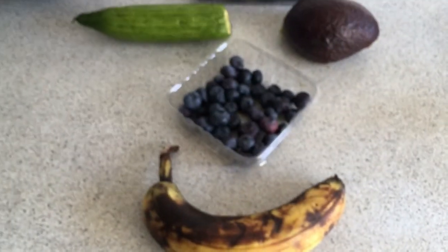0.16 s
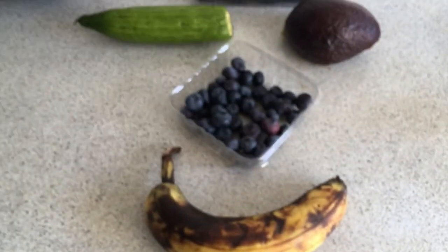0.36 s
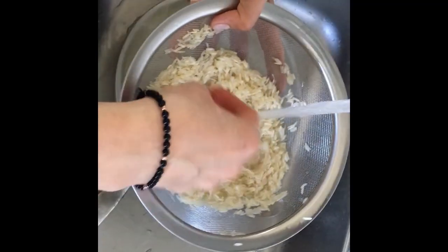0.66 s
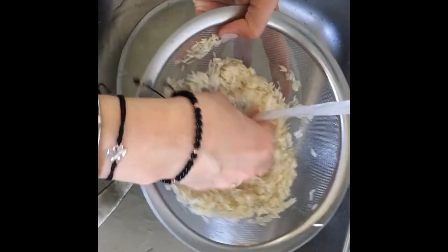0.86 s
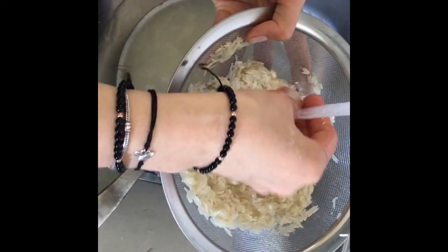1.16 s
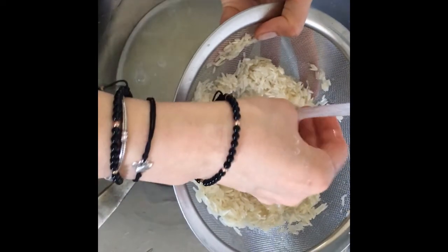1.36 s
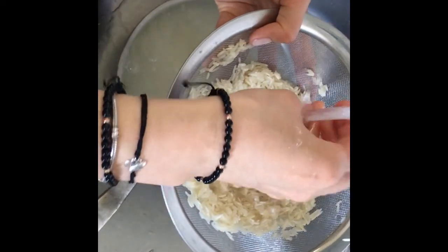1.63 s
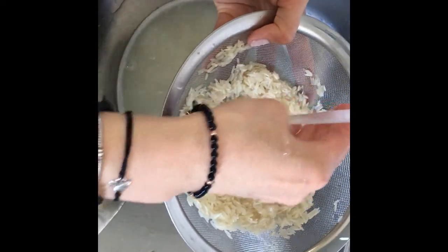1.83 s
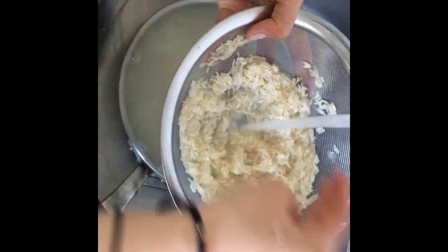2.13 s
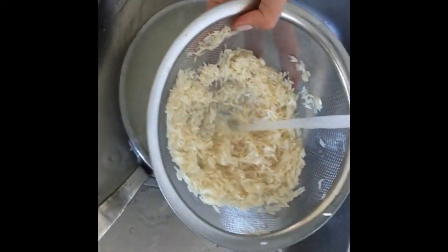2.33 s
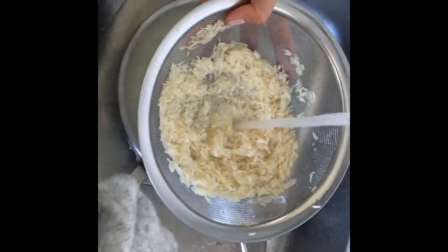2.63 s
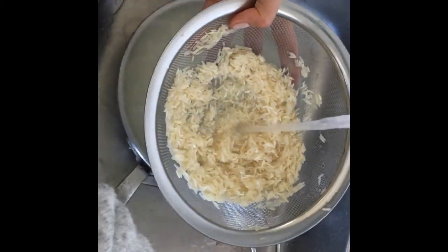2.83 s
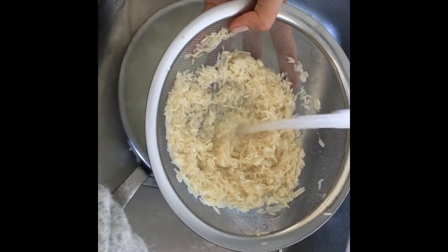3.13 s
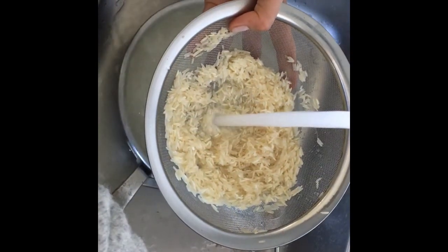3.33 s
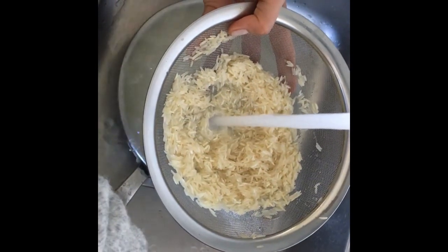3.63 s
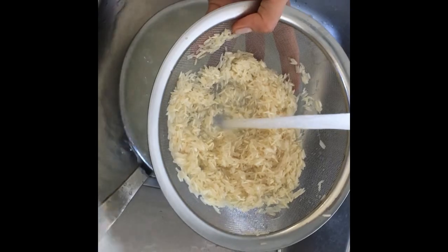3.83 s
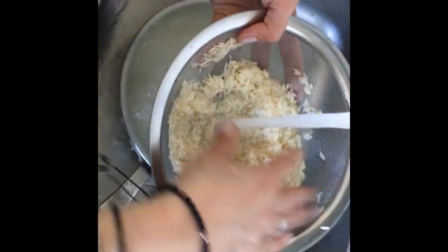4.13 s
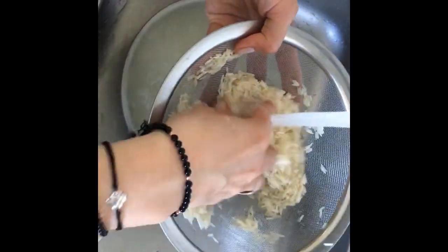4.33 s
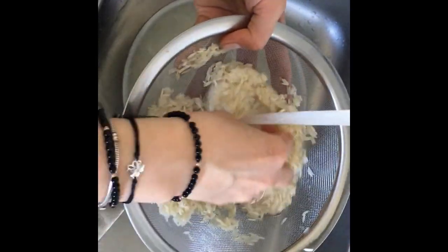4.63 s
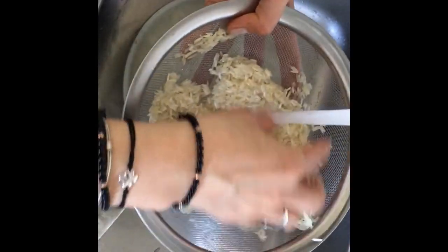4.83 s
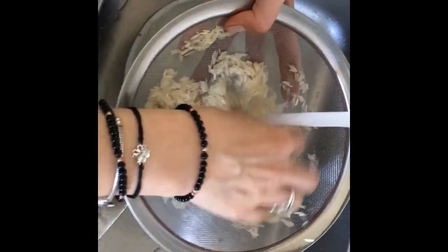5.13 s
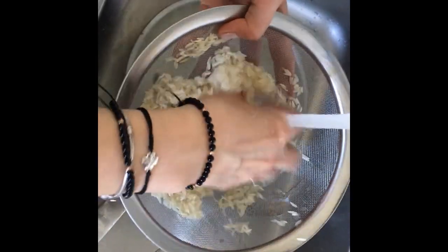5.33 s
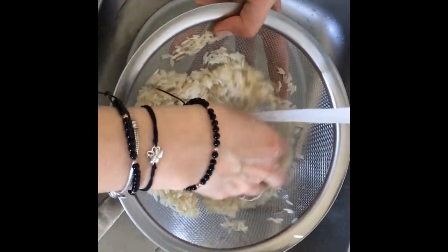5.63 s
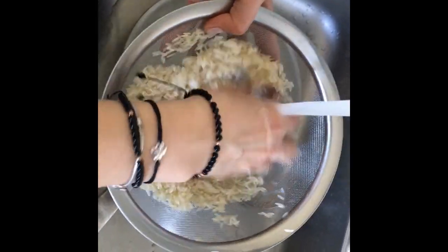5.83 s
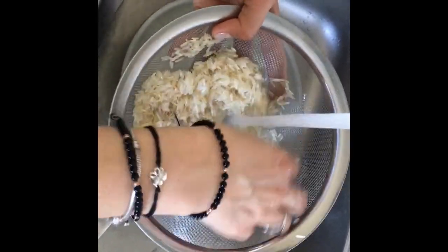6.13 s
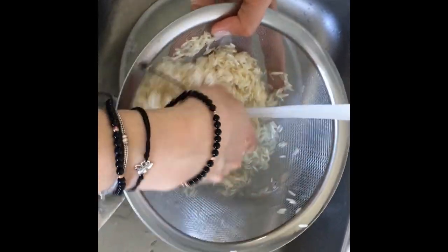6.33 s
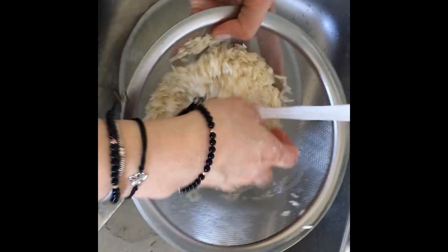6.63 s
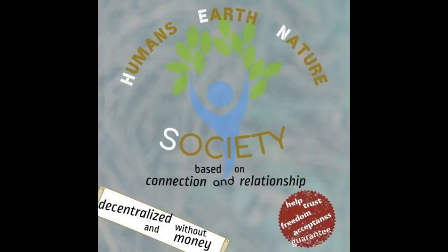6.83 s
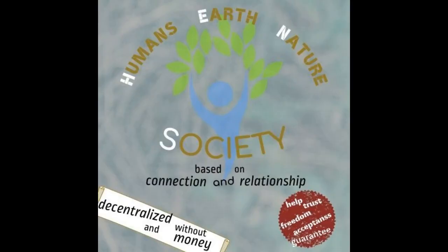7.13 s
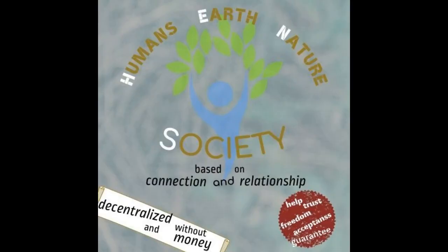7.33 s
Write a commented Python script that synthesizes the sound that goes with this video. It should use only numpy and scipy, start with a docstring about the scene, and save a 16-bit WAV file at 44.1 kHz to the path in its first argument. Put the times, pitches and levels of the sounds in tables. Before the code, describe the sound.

A close, bright stream of water patters over wet rice in a metal sieve, with bubbly glugs below, strengthening midway before cutting to silence.

```python
"""Tap water runs onto rice in a steel sieve while a hand stirs it, close up in a kitchen; mono.
The jet is a patter of echoing clicks in coloured bands; air pockets ring as decaying, gliding sines.
The run-off gurgles as a stream of bubbles, glugs into a bowl and drums on the modes of a steel sink.
A moment of quiet, humming kitchen comes first; the water cuts in and out abruptly, then silence."""
import sys
import numpy as np
from scipy import signal
from scipy.fft import rfft, irfft
from scipy.io import wavfile
from scipy.ndimage import uniform_filter1d

SR = 44100
rng = np.random.default_rng(int(sys.argv[2]) if len(sys.argv) > 2 else 0)


def transcribe(signal):
    """Save signal, clipped to [-1, 1], as a 16-bit WAV file at the path in sys.argv[1]."""
    frames = np.atleast_2d(signal).T
    limited = np.clip(frames, -1, 1)
    pcm = np.round(limited * 32767).astype(np.int16)
    wavfile.write(sys.argv[1], SR, pcm)


N = 329427
T = np.arange(N) / SR  # seconds

# Force of the jet on the rice; the tap opens further just after three seconds.
# Each row: time in seconds, spray level in dB.
JET_FORCE = [(.6, -44), (1.15, -44.5), (1.4, -46), (1.75, -48), (2.1, -46), (2.3, -44), (2.7, -44.5),
             (2.9, -47), (3.13, -51), (3.18, -48), (3.27, -45), (3.38, -39.5), (3.58, -36), (3.95, -40.5),
             (4.36, -36.5), (4.5, -39), (4.66, -36.5), (4.8, -40.5), (4.9, -39), (5.14, -41.5),
             (5.4, -38.5), (5.5, -35), (5.62, -36.5), (5.8, -37), (6.18, -40.5), (6.85, -39.5)]
# The jet bores into the wet rice and sizzles. Each row: time in seconds, level against the spray in dB.
SIZZLE_CURVE = [(3.2, -11.5), (3.45, -2), (3.65, -1.5), (3.85, -3.5), (4.2, -8), (4.5, -12)]
# How finely the jet breaks up. Each row: time in seconds, droplets per second.
JET_BREAKUP = [(.6, 340), (.9, 1140), (1.1, 810), (3.1, 660), (3.5, 1800), (4.4, 1700), (5.3, 4900),
               (6.85, 15000)]
# Spectrum of the spray. Each row: frequency in Hz, relative density in dB per Hz.
SPRAY_SPECTRUM = [(900, -8.5), (2500, -0.5), (4200, 0.5), (6200, 3.5), (8000, -2), (9500, 1.5),
                  (11000, -10), (14000, -18)]
# Spectrum of the high mist, in the same columns: frequency in Hz, relative density in dB per Hz.
MIST_SPECTRUM = [(5000, -30.5), (9000, -14), (11500, 2.5), (13500, 3), (15500, 3), (17000, -26)]
# levels in dB at the usual force: the spray itself, its mist, fizz in the rice, prickle, splashes
USUAL_DB, MIST_DB, FIZZ_DB, PRICKLE_DB, SPATTER_DB = -39, -39, -53, -47.5, -50.5
# dB gained per dB of force
MIST_FOLLOWS, FIZZ_FOLLOWS, SPATTER_FOLLOWS = 1, 1, 0.68
# a burst air pocket leaves a trail of fizz: level against the pop in dB, time to die in s
TRAIL_DB, TRAIL_T60_S = -21, 0.28


def jet():
    """Impact noise: drops spatter on the rice and air between the grains fizzes, all following the force."""
    spray_db = in_time(JET_FORCE)[0] + sweeps()
    force_db = spray_db - USUAL_DB
    drops = patter(*in_time(JET_BREAKUP))

    sizzle_db, = in_time(SIZZLE_CURVE)
    sizzle = rms_one(resonance(impacts(per_s=4000, spread_db=8.5), hz=8500, width_hz=910))
    spray = from_db(spray_db) * (coloured(drops, SPRAY_SPECTRUM) + from_db(sizzle_db) * sizzle)
    mist = from_db(MIST_DB + MIST_FOLLOWS * force_db) * coloured(drops, MIST_SPECTRUM)

    fizz = bubbles(per_s=140, centre_hz=2300, octaves=1.1, cycles=34, spread_db=4.6, rise=.04)
    steady_fizz_gain = from_db(FIZZ_DB + FIZZ_FOLLOWS * force_db)
    trail_gain = from_db(TRAIL_DB) * aftermath(POP_EVENTS, TRAIL_T60_S)
    fizz = np.hypot(steady_fizz_gain, trail_gain) * fizz  # the two powers add
    prickle = bubbles(per_s=170, centre_hz=5800, octaves=1.0, cycles=50, spread_db=4.5, rise=.04)
    prickle = from_db(PRICKLE_DB + force_db) * prickle

    splashes = spatter(per_s=60, low_hz=1450, high_hz=6000, t60=.016, width=.13, spread_db=9.5)
    splashes = from_db(SPATTER_DB + SPATTER_FOLLOWS * force_db) * splashes
    return spray + mist + fizz + prickle + splashes


# The stirring hand sweeps through the jet and the spray swells, or is briefly shielded.
# Each row: time of the height in seconds, length in seconds, gain in dB.
HAND_SWEEPS = [(0.901, 0.2, 9.5), (5.037, 0.16, 3.5), (5.292, 0.27, 5.5), (5.75, 0.13, 2.5),
               (5.909, 0.13, 4.5), (6.014, 0.25, 5), (6.202, 0.05, -2.5), (6.255, 0.046, 6.5),
               (6.471, 0.46, 5), (6.672, 0.097, -5)]


def sweeps():
    """Amplitude modulation: each pass of the hand raises or lowers the spray in one smooth hump, in dB."""
    total_db = 0
    for s, length, db in HAND_SWEEPS:
        total_db = total_db + db * np.cos(np.pi * np.clip((T - s) / length, -.5, .5)) ** 2
    return total_db


def patter(per_s):
    """Clustered shot noise: droplets tick in clumps with a wash of echoes; the finer the jet, the smoother."""
    t = T[:SR // 4]
    clumps = signal.fftconvolve(np.abs(impacts(per_s=75, spread_db=3.0)), dying(t, t60=0.024))[:N]
    ticks = steadied(impacts(per_s, spread_db=4.2), size=9001)
    ticks = ticks * np.sqrt(1 + 1300 / per_s * np.abs(clumps) / clumps.mean())
    # diffuse echoes: noise that follows the decaying power of the ticks
    echo_power = dying(t, t60=0.08) ** 2 + from_db(-10.0) ** 2 * dying(t, t60=0.39) ** 2
    wash_power = signal.fftconvolve(ticks ** 2, echo_power / echo_power.sum())[:N]
    wash = np.sqrt(np.abs(wash_power)) * rng.standard_normal(N)
    return steadied(ticks + from_db(2.0) * wash, size=5001)


def spatter(per_s, low_hz, high_hz, t60, width, spread_db):
    """Band-limited noise bursts: small splashes at random, each around a pitch of its own."""
    out, t = np.zeros(N), T[:SR // 20]
    starts = np.flatnonzero(rng.random(N) < per_s / SR)
    for at, (size, strength, life) in zip(starts, rng.random((len(starts), 3))):
        hz = low_hz * (high_hz / low_hz) ** size
        noise = rng.standard_normal(len(t)) * dying(t, t60 * (.5 + life))
        burst = resonance(noise, hz, width * hz)
        burst = rms_one(resonance(burst, hz, 2 * width * hz))
        add(out, at / SR, from_db(spread_db * strength) * burst)
    return rms_one(in_basin(out, near_db=3.0, room_db=-3.0)[:N])


# Sharp splats of drops. Each row: start in seconds, level of the loudest 5 ms in dB,
# centre of the band in Hz, strength of crack and echoes against the first click in dB (offset below).
SPLAT_EVENTS = [(0.675, -28.5, 12500, 7), (0.772, -32, 6100, 12), (0.83, -35.5, 6000, 13),
                (.947, -35, 6370, 2.5), (1.034, -30.5, 5960, 6.5), (1.1281, -24.5, 13100, 9),
                (1.157, -31, 8440, -0.5), (1.219, -34.5, 8800, 17), (1.3898, -31, 4300, 11.5),
                (1.459, -35.5, 8000, 10.5), (1.586, -32, 14500, 2), (1.6464, -28.5, 6300, -1),
                (1.845, -24.5, 11100, 6), (2.0208, -27.5, 13900, 6), (2.1244, -19, 6200, 4.5),
                (2.207, -35, 13000, 9), (2.269, -29, 13000, 9), (2.295, -34, 7560, 3),
                (2.3626, -33, 11000, 0), (2.461, -37, 7000, 8), (2.529, -34, 12500, 6),
                (2.557, -42, 5500, 6), (2.618, -41, 13000, 9), (2.6768, -28.5, 5350, 2),
                (2.749, -41, 12000, 14), (2.7824, -35.5, 13800, 5.5), (3.023, -34.5, 13900, 1),
                (3.159, -31, 13300, 8), (3.23, -30, 13600, 10), (3.381, -31, 11900, 6.5),
                (3.4835, -22, 12500, 4.5), (3.614, -26, 8400, 3), (3.816, -23, 13000, 6.5),
                (3.983, -23.5, 11900, -3.5), (4.2644, -28.5, 8300, -14), (4.4457, -24.5, 14000, 4.5),
                (5.029, -15.5, 16600, 9), (5.7638, -24.5, 12000, 8), (6.148, -29.5, 6540, 1)]
# relative width of a splat's band at full scale; softer splats are narrower
SPLAT_WIDTH = 1.75
# share of a splat that spreads over the whole treble in dB, and where that starts in Hz
SPLAT_BROAD_DB, SPLAT_BROAD_HZ = -11.5, 1200


def splats():
    """Transient impact: a large drop slaps down with a click and crack in a broad band, then a wash of echoes."""
    out, t = np.zeros(N), T[:SR // 30]
    for s, db, hz, wash_db in SPLAT_EVENTS:
        click = t == 0
        crack = rng.standard_normal(len(t)) * dying(t, t60=0.008) * from_db(wash_db - 14) + click
        crack = in_basin(crack, near_db=wash_db - 4, near_t60=0.04, room_db=wash_db - 14, room_t60=.25)
        span = 1 + SPLAT_WIDTH * from_db(db / 2)
        edges = np.clip([hz / span, hz * span], 100, SR / 2 - 2000)
        band = signal.sosfilt(signal.butter(2, edges, "band", fs=SR, output="sos"), crack)
        broad = signal.sosfilt(signal.butter(1, SPLAT_BROAD_HZ, "high", fs=SR, output="sos"), crack)
        add(out, s, at_peak(band + from_db(SPLAT_BROAD_DB) * broad, db))
    return out


# Small air pockets bursting. Each row: start in seconds, level of the loudest 5 ms in dB, pitch in Hz.
POP_EVENTS = [(0.599, -40, 1810), (.626, -41, 1430), (0.675, -36.5, 2200), (0.711, -33.5, 2890),
              (0.733, -43, 1770), (0.7645, -29, 2840), (0.771, -34.5, 1520), (0.8148, -29.5, 2250),
              (0.9883, -41.5, 1200), (1.194, -43, 1670), (1.258, -35, 2280), (1.2962, -26, 2160),
              (1.396, -38, 1980), (1.4198, -39, 2090), (1.464, -39.5, 1610), (1.5992, -34.5, 4200),
              (1.62, -35.5, 3250), (1.644, -36.5, 1930), (1.7297, -43.5, 2210), (1.823, -29, 2026),
              (1.846, -27, 1830), (2.0826, -43, 1400), (2.1258, -36.5, 1820), (2.1765, -42, 2590),
              (2.2427, -36, 2130), (2.294, -34.5, 2700), (2.36, -36, 3970), (2.3885, -43.5, 1620),
              (2.459, -35.5, 3400), (2.4942, -43, 1960), (2.524, -43, 2440), (2.62, -40, 3340),
              (2.741, -40.5, 3070), (2.7685, -36, 2310), (2.835, -36.5, 2070), (2.954, -45, 2550),
              (3.0769, -43, 1980), (3.384, -39, 2310), (3.4395, -35.5, 1580), (3.4644, -36.5, 2640),
              (3.481, -30.5, 1840), (3.526, -34.5, 2530), (3.614, -39.5, 2600), (3.744, -33, 2490),
              (3.816, -30.5, 3400), (3.88, -31, 3030), (3.976, -33.5, 2290), (4.0488, -37.5, 3350),
              (4.147, -32, 3650), (4.3277, -29, 2690), (4.7915, -33.5, 1730), (4.791, -34, 3030),
              (4.877, -34.5, 2900), (5.0165, -31.5, 2730), (5.066, -42, 2080), (5.2, -37.5, 1940),
              (6.147, -32.5, 3170), (6.3815, -28.5, 3470), (6.4616, -32, 3120)]
POP_T60_S = 0.021


def pops():
    """Bubble resonance: small pockets of air ring high and briefly."""
    rows = [(*row, POP_T60_S) for row in POP_EVENTS]
    return pockets(rows, slap_db=1.5, slap_cycles=38.0, slap_width=0.6, rise=0.07,
                   near_db=3.0, room_db=-6.0)


# Gulps of water landing in the bowl. Each row: start in seconds, level of the loudest 5 ms in dB,
# pitch in Hz, time for the ring to fall 60 dB in seconds.
GLUG_EVENTS = [(.603, -46, 458, 0.091), (0.731, -34, 436, 0.068), (.745, -40, 590, 0.11),
               (0.765, -36.5, 447, 0.14), (0.877, -43, 1170, 0.06), (0.91, -38, 1160, .06),
               (0.926, -49.5, 395, 0.35), (1.064, -40.5, 1143, 0.12), (1.085, -38, 1184, 0.082),
               (1.164, -42, 675, 0.14), (1.355, -45, 1010, .05), (1.522, -43, 560, 0.068),
               (1.885, -36, 333, 0.12), (1.888, -47, 449, .14), (2.25, -40, 1160, 0.042),
               (2.295, -35.5, 1120, 0.053), (2.315, -39.5, 407, 0.098), (2.344, -39, 675, 0.12),
               (2.365, -39.5, 578, 0.18), (2.51, -41.5, 1200, 0.051), (2.579, -40, 1040, 0.17),
               (2.68, -43.5, 820, .07), (2.78, -45, 458, 0.11), (2.835, -45, 373, 0.35),
               (2.921, -42.5, 458, 0.33), (2.922, -45.5, 920, 0.078), (3.002, -45, 486, 0.23),
               (3.005, -45, 654, 0.068), (3.059, -44.5, 888, 0.13), (3.156, -40.5, 392, 0.26),
               (3.234, -42, 390, 0.078), (3.483, -36, 980, 0.044), (3.561, -38.5, 453, 0.13),
               (3.62, -43.5, 910, 0.081), (3.662, -43.5, 800, 0.043), (3.694, -39, 840, .1),
               (3.745, -39.5, 880, 0.12), (3.751, -38, 478, 0.12), (3.86, -43.5, 350, 0.1),
               (4.013, -40, 345, 0.39), (4.05, -45, 386, .25), (4.156, -29.5, 1100, 0.046),
               (4.204, -40, 950, 0.036), (4.373, -34.5, 585, 0.096), (4.471, -46.5, 467, .05),
               (4.645, -38, 830, 0.049), (4.685, -38.5, 1250, 0.036), (4.792, -41.5, 900, .035),
               (4.891, -37.5, 645, 0.083), (5.01, -46.5, 329, .25), (5.199, -45.5, 334.5, 0.35),
               (5.511, -37.5, 638, 0.12), (5.687, -44, 640, .08), (5.75, -36, 740, 0.02),
               (5.786, -43, 470, 0.091), (5.85, -38, 960, 0.038), (5.98, -39.5, 776, 0.027),
               (6.04, -47.5, 335, 0.39), (6.222, -33, 633, 0.065), (6.292, -37.5, 655, 0.017),
               (6.49, -38, 338.5, 0.23), (6.587, -40, 351, 0.16), (6.589, -42, 800, .03),
               (6.661, -45.5, 375, 0.21), (6.728, -41.5, 724, 0.048)]


def glugs():
    """Bubble resonance: larger pockets of air ring lower as water gulps into the bowl."""
    return pockets(GLUG_EVENTS, slap_db=2.0, slap_cycles=30.0, slap_width=0.55, rise=0.065,
                   near_db=-4.0, room_db=-12.0)


def pockets(rows, slap_db, slap_cycles, slap_width, rise, near_db, room_db):
    """Cavity closure: a wet slap around the pitch, longer the lower it is, and a ring with its own glide."""
    out, t = np.zeros(N), T[:SR // 3]
    glides = rise * (1 + rng.standard_normal(len(rows)))  # mostly upward, some downward
    for (s, db, hz, t60), glide in zip(rows, glides):
        slap = rng.standard_normal(len(t)) * dying(t, slap_cycles / hz)
        slap = resonance(slap, hz, slap_width * hz)
        slap = resonance(slap, hz, 2 * slap_width * hz)
        ring = bubble(t, hz * (1 - glide / 6), t60, glide)
        sound = at_peak(ring, 0) + at_peak(slap, slap_db)
        add(out, s, at_peak(in_basin(sound, near_db=near_db, room_db=room_db), db))
    return out


# Water falling from the sieve. Each row: time in seconds, gurgle level in dB.
GURGLE_CURVE = [(.6, -61.5), (1.4, -51), (1.75, -65.5), (2.3, -57), (2.95, -55), (3.25, -60.5), (3.7, -57),
                (4.3, -50.5), (4.55, -76.5), (4.78, -45.5), (5.05, -67), (5.4, -61), (5.8, -47),
                (6.15, -55), (6.85, -54.5)]
# The run-off drumming on the sink. Each row: time in seconds, drumming level in dB.
DRUM_CURVE = [(.6, -50), (1.3, -52.5), (1.7, -53), (2.3, -52), (2.75, -49.5), (3.1, -59), (3.4, -52.5),
              (3.65, -44.5), (4.15, -55.5), (4.42, -49), (4.6, -54), (4.82, -49), (5.22, -49), (5.38, -59),
              (5.55, -46), (5.85, -55.5), (6.15, -52.5), (6.55, -54), (6.85, -55)]
# a gush follows each gulp: gurgle against a light gulp, drumming and the bowl's hollow ring
# against a heavy one, all in dB; time to die in s
GUSH_GURGLE_DB, GUSH_DRUM_DB, GUSH_HOLLOW_DB, GUSH_T60_S = -13, -1, -11.5, 0.26
# gulps below this pitch are heavy enough to drum; the bowl's modes below it ring during the gush
HEAVY_HZ = 560


def runoff():
    """Bubble and modal sound: strands gurgle and drum; a gush after heavy gulps rings the bowl's low modes."""
    light_gush = aftermath([row for row in GLUG_EVENTS if row[2] >= HEAVY_HZ], GUSH_T60_S)
    heavy_gush = aftermath([row for row in GLUG_EVENTS if row[2] < HEAVY_HZ], GUSH_T60_S)

    gurgle_db, = in_time(GURGLE_CURVE)
    gurgle = bubbles(per_s=125, centre_hz=850, octaves=1.3, cycles=36, spread_db=2.8, rise=.04)
    gurgle = np.hypot(from_db(gurgle_db), from_db(GUSH_GURGLE_DB) * light_gush) * gurgle

    drum_db, = in_time(DRUM_CURVE)
    drum = steadied(ringing(impacts(per_s=190, spread_db=3.5), SINK_MODES), size=14001)
    drum = np.hypot(from_db(drum_db), from_db(GUSH_DRUM_DB) * heavy_gush) * drum

    low_modes = [mode for mode in BOWL_MODES if mode[0] < HEAVY_HZ]
    hollow = steadied(ringing(impacts(per_s=180, spread_db=6.0), low_modes), size=6001)
    return gurgle + drum + from_db(GUSH_HOLLOW_DB) * heavy_gush * hollow


def aftermath(rows, t60, rise_s=0.013):
    """Energy summation: the gain of the churning each event stirs up rises quickly and dies away."""
    power, t = np.zeros(N), T[:SR // 2]
    swell = (1 - np.exp(-t / rise_s)) * dying(t, t60)
    for s, db, *_ in rows:
        add(power, s, (from_db(db) * swell) ** 2)
    return np.sqrt(power)


# Modes of the steel sink. Each row: frequency in Hz, relative gain in dB, 60 dB decay time in seconds.
SINK_MODES = [(51.7, 7.5, 0.37), (66, -1, 0.11), (106.3, 2, 0.23), (153.2, 5, 0.37), (333.7, -5.5, 0.57),
              (386, 4, 0.77)]
BOOM_HZ = 300  # modes below this boom under a gulp


def sink_boom(gulps):
    """Modal resonance: gulps leave the sink's low modes ringing."""
    return from_db(9.0) * ringing(gulps, [mode for mode in SINK_MODES if mode[0] < BOOM_HZ])


# Modes of the bowl and sieve rim. Each row: frequency in Hz, relative gain in dB,
# 60 dB decay time in seconds.
BOWL_MODES = [(338, 1.5, 0.32), (458, 9, 1), (880, -4, 0.045), (1154, 5, 0.1), (1381, 2, 0.13),
              (1624, 1, 0.091), (2260, 5, 0.25), (2690, -1, 0.064), (3087, 3.5, 0.043)]


def bowl_ring(water):
    """Modal resonance: all the water sounds set the bowl and sieve rim ringing."""
    return from_db(-4.5) * ringing(water, BOWL_MODES)


# Soft bumps and light taps. Each row: start in seconds, level of the loudest 5 ms in dB,
# pitch in Hz, width of the resonance in Hz.
BUMP_EVENTS = [(0.086, -51, 202, 100), (.273, -63, 900, 1200), (0.513, -55, 90, 50), (2.13, -47, 154, 29),
               (2.134, -50, 305, 165), (2.71, -39, 111, 40), (4.781, -46.5, 108, 25)]


def bumps():
    """Impulse response: a soft contact gives one short, rounded swing at its pitch."""
    out, click = np.zeros(N), 1.0 * (T[:SR // 4] == 0)
    for s, db, hz, width_hz in BUMP_EVENTS:
        swing = resonance(resonance(click, hz, width_hz), hz, width_hz)
        add(out, s, at_peak(swing, db))
    return out


# Spectrum of the room noise. Each row: frequency in Hz, relative density in dB per Hz.
ROOM_SPECTRUM = [(15, -52), (25, -5.5), (55, -4.5), (120, -16.5), (229, -21.5), (463, -33.5), (641, -35),
                 (1070, -37.5), (3250, -44), (3620, -41), (4250, -48.5), (14400, -44.5), (16000, -46)]
# Mains hum and appliance whine. Each row: frequency in Hz, rms level in dB.
HUM_TONES = [(50, -65), (646, -78), (3515, -78.5)]
ROOM_DB = -57


def quiet_kitchen():
    """Stationary background: dull room noise with a faint hum and whine, and a brief soft rustle."""
    room = from_db(ROOM_DB) * coloured(rng.standard_normal(N), ROOM_SPECTRUM)
    hum = sum(from_db(db) * np.sqrt(2) * np.sin(2 * np.pi * hz * T) for hz, db in HUM_TONES)
    rustle = from_db(-68.5) * rng.standard_normal(N) * np.exp(-((T - .175) / .04) ** 2)
    return room + hum + rustle


def bubble(t, hz, t60, rise):
    """Bubble resonance: an air pocket rings and, for a positive rise, climbs as it nears the surface."""
    return np.sin(2 * np.pi * hz * (t + rise * np.minimum(t, t60) * t / (2 * t60))) * dying(t, t60)


def bubbles(per_s, centre_hz, octaves, cycles, spread_db, rise):
    """Bubble population: a stream of random sizes, of which the small ring higher and shorter."""
    out = np.zeros(N)
    for when, size, squeeze, strength, life in rng.random((int(per_s * N / SR), 5)):
        hz = min(centre_hz * 2 ** (octaves * (size - squeeze)), SR / 3)
        t60 = cycles * (.5 + life) / hz
        gain = from_db(-spread_db * np.log(strength + .03)) * np.sqrt(hz)
        add(out, when * N / SR, gain * bubble(T[:int(t60 * SR)], hz, t60, rise))
    return steadied(scattered(out), size=9001)


def scattered(x, size=2600):
    """Varying reflections: the water lands somewhere else each moment, so its echoes keep changing."""
    out = np.zeros(N)
    for at in range(0, N, size):
        echoed = in_basin(x[at:at + size], near_db=2.0, near_t60=0.076, room_db=-4.5, room_t60=0.093)
        add(out, at / SR, echoed)
    return out


def in_basin(x, near_db=3.0, near_t60=0.068, room_db=-11.0, room_t60=0.54):
    """Reverberation: direct sound, a flurry of echoes off the steel walls, then the kitchen's tail."""
    t = T[:SR // 4]
    near = rng.standard_normal(len(t)) * dying(t, near_t60)
    far = rng.standard_normal(len(t)) * dying(t, room_t60) * (t > .005)
    response = from_db(near_db) * near / np.linalg.norm(near) + from_db(room_db) * far / np.linalg.norm(far)
    response[0] += 1  # direct sound
    return signal.fftconvolve(x, response / np.linalg.norm(response))


def ringing(x, modes):
    """Modal superposition: a body driven by x rings in its modes, of width ln(1000) / (pi t60)."""
    return sum(from_db(db) * resonance(x, hz, np.log(1000) / (np.pi * t60)) for hz, db, t60 in modes)


def resonance(x, hz, width_hz):
    """Simple resonator: a two-pole band-pass of gain 1 on top."""
    r = np.exp(-np.pi * width_hz / SR)
    numerator = np.array([1, 0, -1]) * (1 - r * r) / 2
    denominator = [1, -2 * r * np.cos(2 * np.pi * hz / SR), r * r]
    return signal.lfilter(numerator, denominator, x + 1e-18)


def impacts(per_s, spread_db):
    """Shot noise: random clicks, many small and a few large."""
    sizes = from_db(spread_db * np.minimum(rng.exponential(1, N), 4))
    return sizes * rng.choice([-1, 1], N) * (rng.random(N) < per_s / SR)


def coloured(x, spectrum):
    """Spectral shaping: give x a smooth spectrum and unit rms."""
    hz, db = np.transpose(spectrum)
    bins = np.maximum(np.arange(N // 2 + 1) * SR / N, 1)
    gain = from_db(np.interp(np.log(bins), np.log(hz), db))
    gain = gain * np.minimum(bins / hz[0], 1) ** 2  # 12 dB per octave below the first point
    return rms_one(irfft(rfft(x) * gain, N))


def dying(t, t60):
    """Exponential decay: an envelope that falls 60 dB in t60 seconds."""
    return np.exp(-np.log(1000) * t / t60)


def steadied(x, size=4001):
    """Level normalisation: even out the slow level, so that only the grain is left."""
    return x / np.sqrt(np.abs(uniform_filter1d(x ** 2, size)) + 1e-12)


def at_peak(x, db, size=220):
    """Short-time level: scale a sound so that its loudest 5 ms have this rms level."""
    return x * from_db(db) / np.sqrt(uniform_filter1d(x ** 2, size).max() + 1e-20)


def rms_one(x):
    """Mean-power normalisation: scale to unit rms."""
    return x / np.sqrt(np.mean(x ** 2) + 1e-20)


def from_db(db):
    """Logarithmic level: decibels to amplitude gain."""
    return 10 ** (np.asarray(db) / 20)


def in_time(rows):
    """Linear interpolation: each column of a curve at every sample."""
    s, *columns = np.transpose(rows)
    return [np.interp(T, s, c) for c in columns]


def add(out, s, sound):
    """Superposition: mix a sound in at time s."""
    at = int(np.clip(s * SR, 0, N - 1))
    out[at:at + len(sound)] += sound[:N - at]


WATER_ON_S, WATER_OFF_S, QUIET_END_S = .598, 6.854, .588


def scene():
    """Superposition of sources: first the quiet kitchen, then the running tap, with bumps in both."""
    gulps = glugs()
    water = jet() + splats() + pops() + gulps + runoff() + sink_boom(gulps)
    water = water + bowl_ring(water)
    knocks = bumps()
    quiet_part = (quiet_kitchen() + knocks) * (T < QUIET_END_S)
    water_part = (water + knocks) * (T > WATER_ON_S) * (T < WATER_OFF_S)
    mono = quiet_part + water_part
    return np.array([mono, mono])


# Narrow dips in the microphone's response. Each row: frequency in Hz, width in Hz, depth from 0 to 1.
MICROPHONE_DIPS = [(4906, 610, 0.42), (10370, 450, 0.4)]
CUTOFF_HZ = 15900


def record(dry):
    """Frequency response: the microphone hollows two treble bands; the deepest bass and the top are cut."""
    for hz, width_hz, depth in MICROPHONE_DIPS:
        dry = dry - np.clip(depth, 0, 1) * resonance(dry, hz, width_hz)
    dry = signal.sosfilt(signal.butter(2, 42, "high", fs=SR, output="sos"), dry)
    return signal.sosfilt(signal.ellip(12, .1, 70, CUTOFF_HZ, fs=SR, output="sos"), dry)


dry = scene()
out = record(dry)
transcribe(out)
```